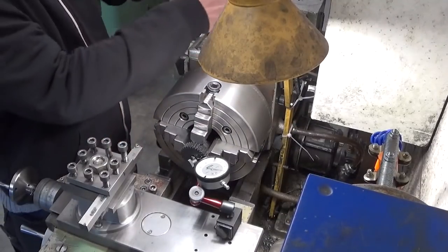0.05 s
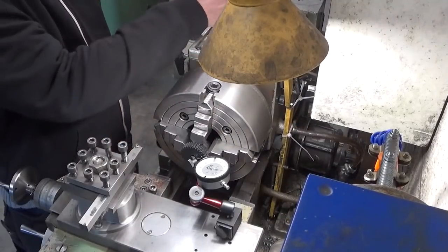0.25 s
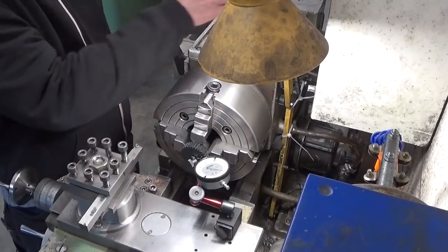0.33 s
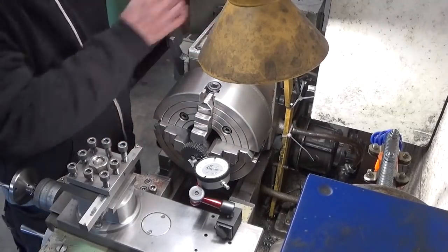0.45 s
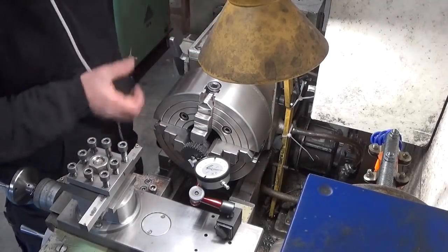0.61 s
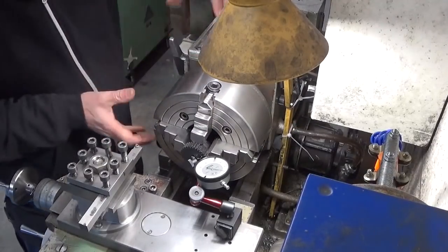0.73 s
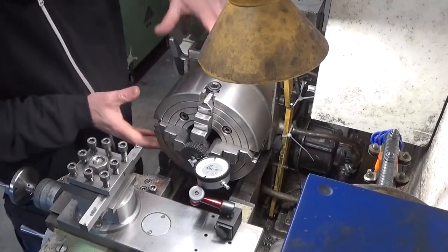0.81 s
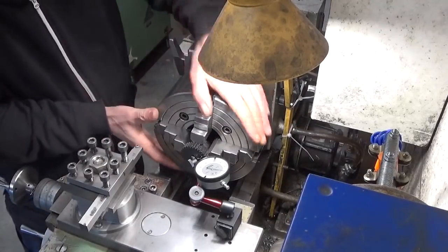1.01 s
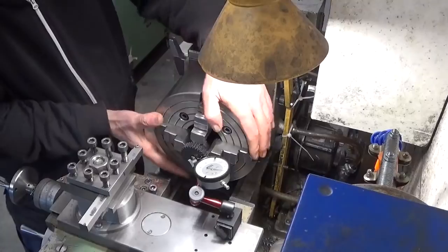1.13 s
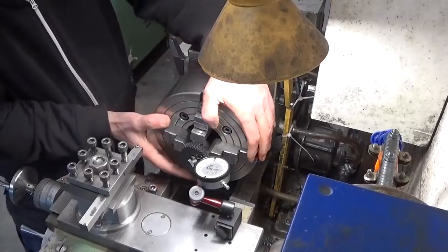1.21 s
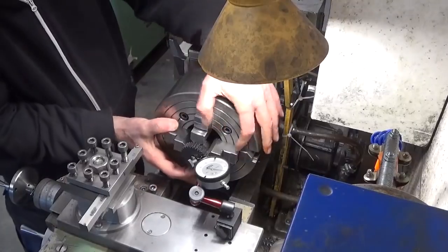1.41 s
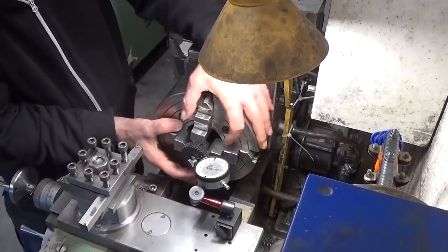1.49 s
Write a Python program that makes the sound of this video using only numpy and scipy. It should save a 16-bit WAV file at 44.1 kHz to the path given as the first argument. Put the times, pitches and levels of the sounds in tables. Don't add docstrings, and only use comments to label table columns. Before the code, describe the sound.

A steel chuck key clanks and bounces on a lathe's metal tray in two quick clusters, rings briefly and stops, then faint hand brushes on steel, over hiss and low hum in a small workshop.

```python
import sys
import numpy as np
from scipy import signal
from scipy.fft import rfft, irfft, next_fast_len
from scipy.io import wavfile
from scipy.ndimage import uniform_filter1d, map_coordinates

SR = 44100
rng = np.random.default_rng(int(sys.argv[2]) if len(sys.argv) > 2 else 0)


def ratio_of_db(decibels):
    return 10 ** (np.asarray(decibels, float) / 20)


def materialize(psi):
    bounded = np.clip(np.atleast_2d(psi).T, -1, 1)
    quanta = np.round(bounded * 32767).astype(np.int16)
    wavfile.write(sys.argv[1], SR, quanta)


N = 68355
LEAD = 2048


def unit(x):
    return x / np.sqrt(np.mean(x ** 2) + 1e-20)


def along(points, hz):
    f, v = np.transpose(points)
    return np.interp(np.log(hz + 1), np.log(f + 1), v)


def coloured(x, points):
    m = next_fast_len(x.shape[-1] + 8192)
    gain = ratio_of_db(along(points, np.fft.rfftfreq(m, 1 / SR)))
    return irfft(rfft(x, m) * gain, m)[..., :x.shape[-1]]


def spread(pair, alike):
    turn = [(hz, np.arccos(np.clip(c, 0, .999)) / 2) for hz, c in alike]
    mid = coloured(pair[0], [(hz, 20 * np.log10(np.cos(u))) for hz, u in turn])
    side = coloured(pair[1], [(hz, 20 * np.log10(np.sin(u))) for hz, u in turn])
    return np.array([mid + side, mid - side])


def add(track, s, x):
    track[LEAD + round(s * SR):][:len(x)] += x


# f/Hz, level/dB
HISS = [(180, -54), (300, 1.5), (334, 3), (365, -2.5), (640, -6), (2080, -5.5), (10200, -10.5),
        (11200, -21.5), (14600, -42.5), (22000, -120)]
# t/s, level/dB
HISS_CURVE = [(0, -55.5), (.9, -58.5), (1.2, -58.5), (1.35, -61.5), (1.41, -60.5), (1.55, -61)]
# f/Hz, level/dB
HUM = [(15, -50), (25, -21), (97, -3.5), (129, -4.5), (171, -2), (284, -12.5), (341, -16.5), (450, -33.5),
       (580, -45), (990, -120)]
# f/Hz, likeness
FLOOR_ALIKE = [(60, 1), (170, 0.95), (500, 0.43), (1420, 0.24), (4090, 0.68), (11800, 0.74)]
HUM_DB, HUM_WOBBLE_DB, WOBBLE_HZ = -64.5, 1.6, 18


def floor():
    t = np.arange(N) / SR
    gain = ratio_of_db(np.interp(t, *np.transpose(HISS_CURVE)))
    wobble = map_coordinates(rng.standard_normal(40), [t * WOBBLE_HZ])
    hiss = unit(spread(coloured(rng.standard_normal((2, N)), HISS), FLOOR_ALIKE))
    hum = unit(spread(coloured(rng.standard_normal((2, N)), HUM), FLOOR_ALIKE))
    return gain * hiss + ratio_of_db(HUM_DB + HUM_WOBBLE_DB * wobble) * hum


# t/s, crack/dB, clack/dB, tray/dB, thud/dB
KNOCKS = [(-.005, -26, -27, -35.5, -46.5), (0.2478, -12.5, -20.5, -22, -28.5),
          (.2812, -14.5, -10.5, -19.5, -42), (0.3019, -25.5, -11, -22, -38), (.3078, -41, -34, -27, -46.5),
          (.3130, -21, -14, -22, -34), (.3990, -31.5, -28, -36.5, -41), (.4500, -42, -39, -36.5, -37),
          (0.4751, -16.5, -12, -28, -34.5), (0.5027, -20.5, -16, -20.5, -36.5),
          (0.5223, -21, -11.5, -22.5, -39), (.5376, -30, -15, -21.5, -40.5),
          (0.5479, -26, -29, -25.5, -35.5), (0.5563, -19, -17.5, -26, -35.5),
          (.5640, -22, -31, -41.5, -47.5)]
# bend 1/dB, bend 2/dB, bend 3/dB, handle/dB, 8332 Hz handle mode/dB
RINGS = [(-34.5, -26, -32, -36, -58), (-19, -41, -55.5, -36, -39.5), (-46, -54, -18.5, -48, -46),
         (-39, -41, -39, -24, -46), (-30.5, -23.5, -59, -50, -35), (-49, -28.5, -14, -25.5, -52),
         (-40.5, -37, -38.5, -54.5, -67), (-37.5, -40.5, -62, -48.5, -68), (-67, -22, -16, -29, -35.5),
         (-46.5, -27.5, -12, -27.5, -26.5), (-56, -31, -16.5, -38.5, -37.5), (-56, -57, -13, -21, -29),
         (-56, -39, -47, -56, -38), (-52, -46, -31, -27, -35), (-53, -42, -23, -32.5, -50)]
# dB/s, one per contact
SAG_DB_PER_S = [554.5, 194, 109, 159, 158, 803, 97, 132, -70, 89, 163, 208, 400, 210, 270]
KEY_HZ = [1227, 3283, 6160, 6118, 5243, 8332, 4570, 6815]
# level/dB, column of RINGS that drives it
KEY = [(-1.5, 0), (-1.5, 1), (-1.5, 2.5), (0, 3), (-2.5, 3), (-4, 4), (-11, 3), (-18, 3)]
STOP_S, RISE_S = 0.00041, 0.00059


def key():
    out, t = np.zeros(N + SR), np.arange(SR // 2) / SR
    times = [row[0] for row in KNOCKS] + [9]
    for k, levels in enumerate(RINGS):
        flight_s = times[k + 1] - times[k]
        stop = np.exp(-np.clip(t - flight_s, 0, 1) / STOP_S)
        sag = ratio_of_db(-SAG_DB_PER_S[k] * np.minimum(t, flight_s))
        ring = 0
        for hz, (db, column) in zip(KEY_HZ, KEY):
            ring = ring + ratio_of_db(db + levels[round(column)]) * np.sin(2 * np.pi * hz * t)
        add(out, times[k], (1 - np.exp(-t / RISE_S)) * sag * stop * ring)
    return out[:N + LEAD]


SCATTER_DB = 2.5


def struck(modes, t, rise_s):
    hz, db, t60 = np.transpose(modes)[:, :, None]
    g = ratio_of_db(db + SCATTER_DB * rng.standard_normal(db.shape)) * rng.choice([-1, 1], db.shape)
    modes_sum = (g * ratio_of_db(-60 * t / t60) * np.sin(2 * np.pi * hz * t)).sum(axis=0)
    return modes_sum * (1 - np.exp(-t / rise_s))


def burst(points, t, t60, rise_s):
    noise = unit(coloured(rng.standard_normal(len(t)), points))
    return noise * ratio_of_db(-60 * t / t60) * (1 - np.exp(-t / rise_s))


# f/Hz, level/dB
CRACK = [(300, -15), (1200, -4), (3000, -11.5), (5200, 5), (7200, -3), (9000, -12), (11000, -37)]
# f/Hz, level/dB
TRAY = [(400, -63), (900, -11.5), (1400, -10), (1700, -3.5), (2100, 1), (2650, -2), (3200, -6),
        (4500, -24.5)]
# f/Hz, level/dB
THUD = [(70, -33.5), (160, -5), (224, -6), (330, -7.5), (450, -10.5), (620, -2), (780, -10), (950, -11.5)]
# f/Hz, level/dB, t60/s
CLACK = [(4080, -1, 0.014), (3895, -3, 0.011), (4496, -8, 0.025), (6920, -10.5, .016), (5610, -9, 0.014),
         (9110, -16, 0.0088), (7710, -20.5, 0.015)]
CRACK_T60_S, TRAY_T60_S, THUD_T60_S = 0.02, 0.055, .12
BED_HZ, BED_DB, BED_T60_S = 225.3, -5, .11
SPOTS = 3


def tray():
    out, clack, t = np.zeros((SPOTS, N + SR)), np.zeros(N + SR), np.arange(SR // 4) / SR
    for k, (s, crack_db, clack_db, tray_db, thud_db) in enumerate(KNOCKS):
        bed = burst(THUD + [(1500, -42)], t, THUD_T60_S, 0.0043)
        bed = bed + struck([(BED_HZ, BED_DB, BED_T60_S)], t, 0.0067)
        crack = burst(CRACK, t, CRACK_T60_S, 0.00065)
        sheet = burst(TRAY, t, TRAY_T60_S, 0.00076)
        add(out[k % SPOTS], s, ratio_of_db(crack_db) * crack + ratio_of_db(tray_db) * sheet + ratio_of_db(thud_db) * bed)
        add(clack, s, ratio_of_db(clack_db) * struck(CLACK, t, 0.00049))
    return out[:, :N + LEAD], clack[:N + LEAD]


# f/Hz, t60/s
SHOP = [(100, 0.52), (500, 0.64), (2000, 0.52), (5000, 0.42), (8000, 0.42), (11000, 0.18)]
# f/Hz, likeness
ECHO_ALIKE = [(60, 0.6), (200, .99), (400, 0.92), (800, 0.63), (2000, 0.74), (10000, 0.61)]
WALL_S = .004


def shop(x):
    hz, t, z = signal.stft(rng.standard_normal((2, SR)), SR, nperseg=256)
    tail = signal.istft(z * ratio_of_db(-60 * t / along(SHOP, hz)[:, None]), SR, nperseg=256)[1]
    tail = spread(tail / np.linalg.norm(tail[0]), ECHO_ALIKE)
    late = np.pad(x, (round(WALL_S * SR), 0))
    return signal.fftconvolve(late[None], tail, axes=1)[:, :N + LEAD]


# t/s, level/dB, length/s
BRUSH = [
    (0.182, -50, .002),
    (0.22, -66, .002),
    (1.11, -60, 0.0089),
    (1.213, -59.5, .008),
    (1.284, -60.5, 0.078),
    (1.32, -61, .005),
    (1.348, -57, .006),
    (1.512, -58, .012),
]
# f/Hz, level/dB
SKIN = [(2500, -30), (5000, -13), (6500, -4.5), (9000, -3), (10200, -9), (11000, -15), (11500, -60)]


def hands():
    t = np.arange(N) / SR
    shape = sum(ratio_of_db(db - 10 * ((t - s) / length_s) ** 2) for s, db, length_s in BRUSH)
    grain = ratio_of_db(1.8 * unit(uniform_filter1d(rng.standard_normal(N), size=60)))
    skin = spread(coloured(rng.standard_normal((2, N)), SKIN), [(7000, 0.89)])
    return shape * unit(grain * skin)


# f/Hz, level/dB
PAN = [(300, -0.42), (1200, 1), (2500, -2.6), (4000, -1.5), (6500, -1.25), (10000, -0.17)]
KEY_WET_DB, CLACK_WET_DB, TRAY_WET_DB = -9, -10, -3.5


def scene():
    ring = key()
    knocks, clack = tray()
    direct = ring + clack + knocks.sum(axis=0)
    near = np.array([coloured(direct, [(hz, side * db) for hz, db in PAN]) for side in (1, -1)])
    far = ratio_of_db(KEY_WET_DB) * shop(ring) + ratio_of_db(CLACK_WET_DB) * shop(clack)
    far = far + ratio_of_db(TRAY_WET_DB) * sum(shop(k) for k in knocks)
    return (near + far)[:, LEAD:] + hands() + floor()


# f/Hz, level/dB
MIC = [(30, -3.5), (70, 0.5), (130, 1), (11000, -0.5), (11300, -36), (12400, -37), (13200, -60),
       (16000, -75)]


def roll_off(x):
    return signal.sosfilt(signal.butter(12, 12350, fs=SR, output="sos"), x)


def record(dry):
    mix = coloured(dry, MIC)
    return roll_off(mix)


dry = scene()
out = record(dry)
materialize(out)
```